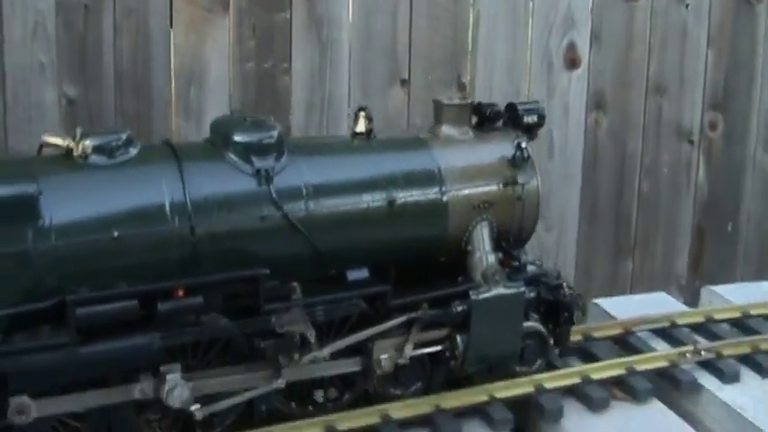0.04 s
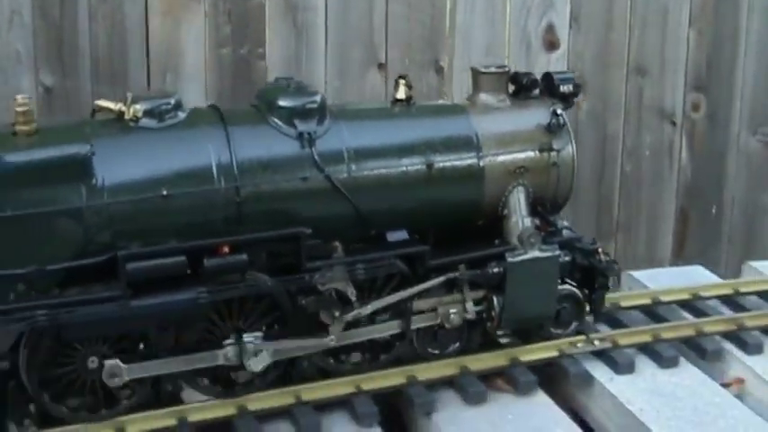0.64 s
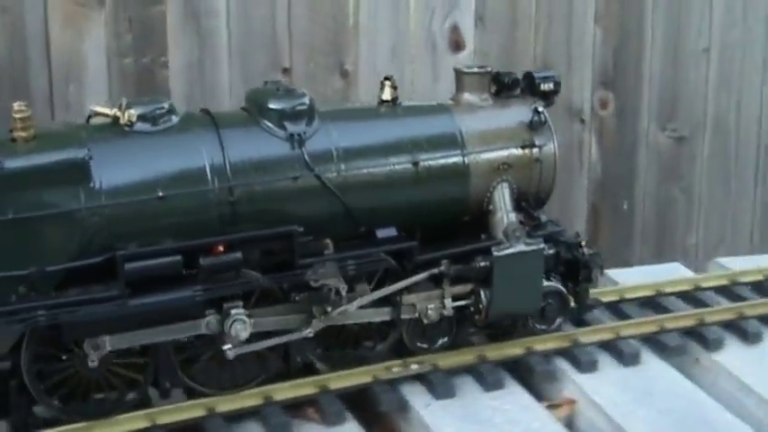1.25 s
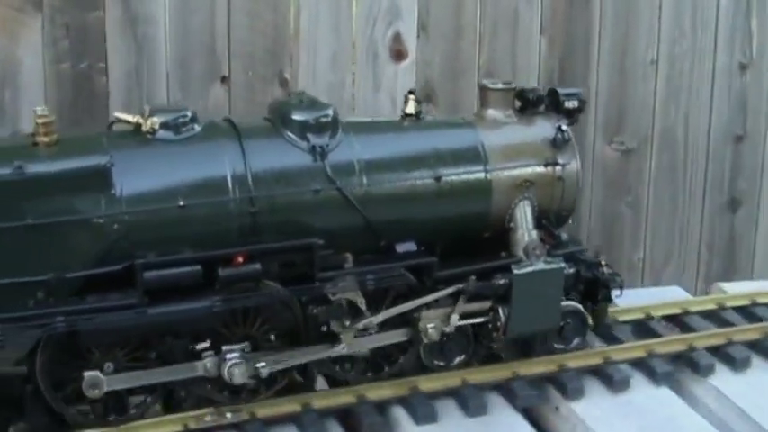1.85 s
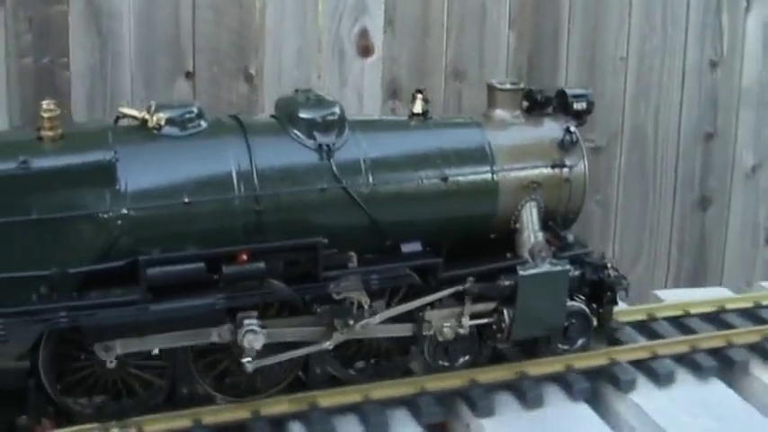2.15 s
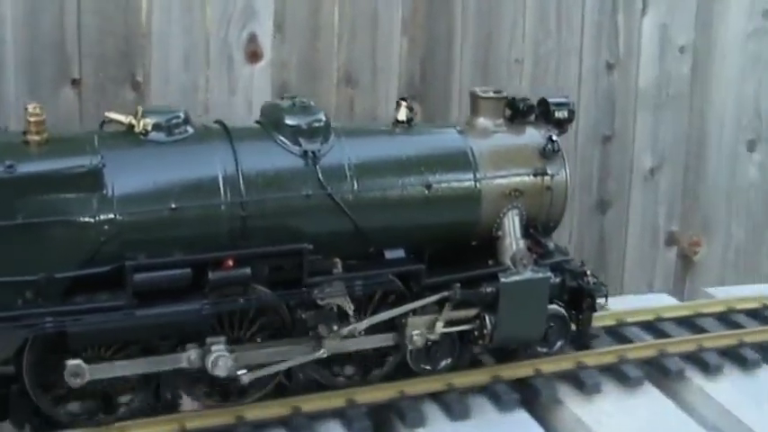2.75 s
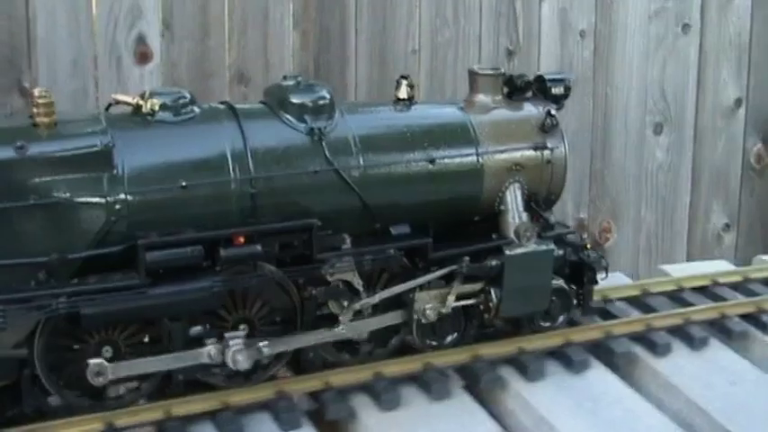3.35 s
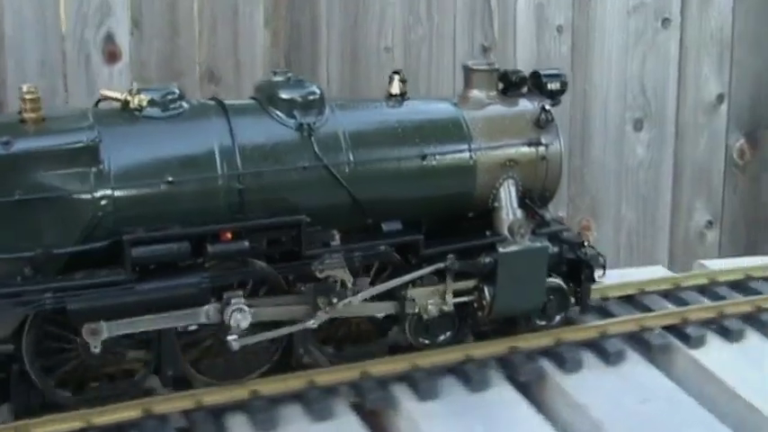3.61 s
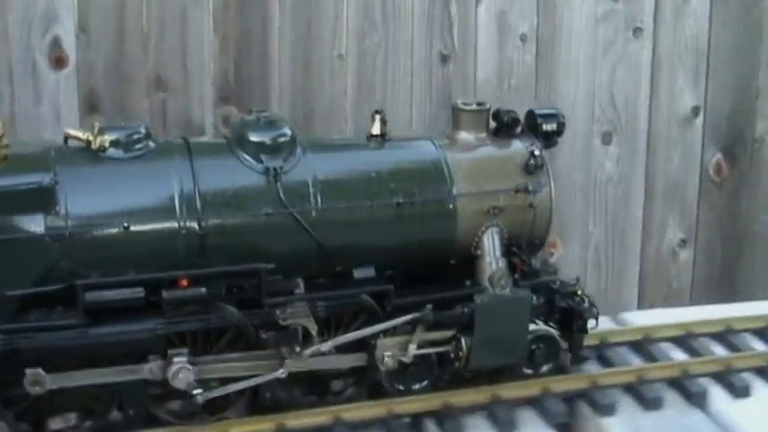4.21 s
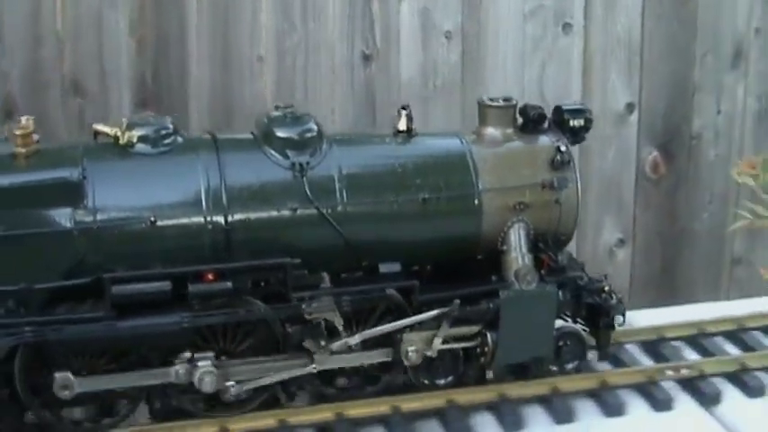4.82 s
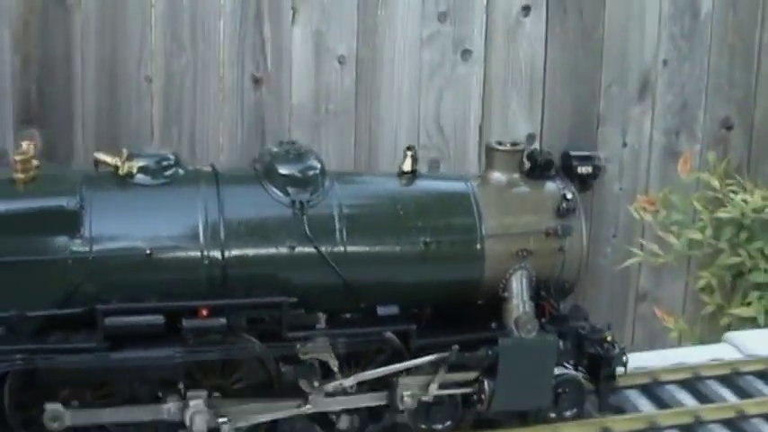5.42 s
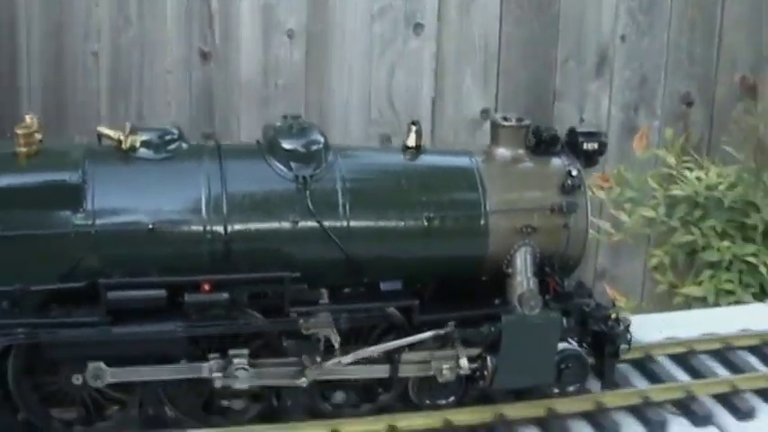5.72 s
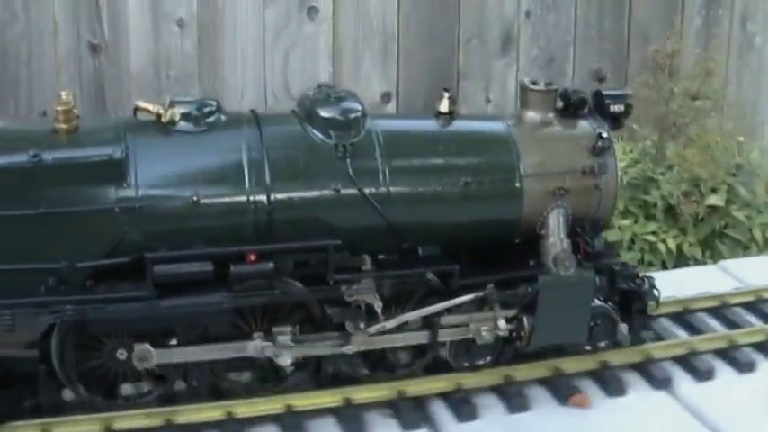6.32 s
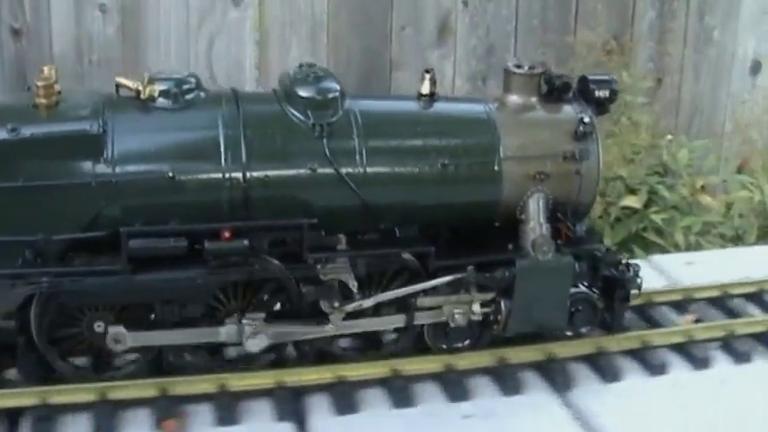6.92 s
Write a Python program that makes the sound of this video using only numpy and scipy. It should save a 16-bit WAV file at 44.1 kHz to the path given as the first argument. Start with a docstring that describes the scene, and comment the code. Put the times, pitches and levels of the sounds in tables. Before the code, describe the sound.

Hissy, hollow chuffs from a small steam engine start at about four a second and build to about seven, repeating an uneven four-beat figure. A soft bed of escaping steam fills the gaps, along with crackling spurts and scattered ticks of water on hot metal. Below, the fire pulses faintly and the wheels rumble. The microphone stays close alongside, outdoors by a wooden fence.

```python
"""A miniature live-steam locomotive chuffs along garden track, gathering speed, heard from close beside it.
Four times a wheel turn a cylinder lets go: the blast pipe hisses near 6 kHz, the smokebox barks and
the draught pulls on the fire. The valves are unevenly set, so the same limping four-beat figure returns
with every turn, its blasts shorter as the speed rises. Between beats steam trails off, a gland blows
in step with the rods and hot water spits from the stack, over a low rumble of wheels."""
import sys
import numpy as np
from scipy.fft import rfft, irfft, next_fast_len
from scipy.io import wavfile
from scipy.ndimage import uniform_filter1d, minimum_filter1d, map_coordinates

SR = 44100
rng = np.random.default_rng(int(sys.argv[2]) if len(sys.argv) > 2 else 0)


def digitize_waveform(pressure):
    """Quantize a signal to 16-bit integers and store it at the path in sys.argv[1].

    Rows of a 2-D input are taken as channels; values are limited to [-1, 1].
    """
    field = np.atleast_2d(pressure).T
    bounded = np.clip(field, -1, 1)
    quanta = np.round(bounded * 32767).astype(np.int16)
    wavfile.write(sys.argv[1], SR, quanta)


N = 311346

# The exhaust beats. Each row: start in seconds, level offset in dB, extra trailing steam in dB.
# The last beat is boosted into an abrupt click as the sound ends.
BEATS = [(0.001, 0, -3), (0.266, -0.5, -1), (0.547, -1, -2), (0.788, 1.5, 2), (0.982, 0, -3),
         (1.222, -0.1, 0), (1.484, 0.5, -7), (1.726, 0.5, -3.5), (1.969, -2, -1.5), (2.192, 0, 0),
         (2.431, 0, 3), (2.632, 0, 4.5), (2.778, 0.5, 0), (2.974, -1, 0), (3.162, 1.5, 1.5),
         (3.337, -1.5, 4), (3.477, 0.5, 2), (3.653, 0.5, 0.5), (3.847, -0.5, -5), (4.034, -1, -0.5),
         (4.212, 0, 1.5), (4.377, -1, 2), (4.554, -0.5, -0.5), (4.721, .3, -2), (4.881, 0, 1.5),
         (5.037, 0.5, 1), (5.202, 0, 1), (5.355, 0.2, 2), (5.501, -.5, 3.5), (5.642, -0.5, 2),
         (5.798, 0, -1), (5.933, 0, 0), (6.07, 1.5, -1.5), (6.208, -0.5, -1.5), (6.356, -0.5, 3),
         (6.492, -0.5, -1), (6.631, -.5, 1), (6.761, 0.5, 1), (6.909, -0.5, -11), (7.052, 6.5, 0)]
# The four beats of a wheel turn. Each row: base blast length in seconds, then base levels in dB of
# nozzle hiss, jet rush, smokebox bark and trailing steam.
TURN = [(.051, -18.5, -27.5, -24.5, -29.5), (0.04, -19.8, -28.5, -25.5, -27),
        (0.052, -19.5, -29.5, -26, -35.5), (.045, -18.5, -27.5, -25, -28)]


def exhaust(sputter_db, flutter_db, surge_db):
    """Each chuff sounds the hissing blast pipe, the broad jet above the stack and the hollow smokebox."""
    # The colours of jet and smokebox. Each row: frequency in Hz, relative level in dB.
    jet = [(300, -8.5), (900, -6.5), (1200, 0.5), (1400, -2), (1600, 3), (1900, 2.5), (2200, -2.5),
           (2480, 0.5), (2850, -2), (4500, -8), (7500, -4), (10300, -5), (12000, -16), (15000, -20.5)]
    smokebox = [(70, -37), (170, -15.5), (280, 0.5), (430, 0.5), (520, -2), (600, 0.5), (810, .5),
                (900, -10.5), (1020, -21), (2000, -60)]
    offset_db, linger_db = beats()[2:]
    hiss_db, rush_db, bark_db, base_trail_db = figure()[1:]
    trail_db = base_trail_db + linger_db
    # wet steam leaves in uneven spurts
    sputter = unit(amp(sputter_db * wobble(600) + flutter_db * wobble(130) + surge_db * wobble(45)))
    hiss = flow(hiss_db + offset_db, trail_db, opening=0.01, stretch=0.93, steepness=6.2, closing=0.11)
    rush = flow(rush_db + offset_db, trail_db - 10, opening=0.0098, stretch=1, steepness=8.6, closing=0.1)
    bark = flow(bark_db + offset_db, trail_db - 5.5,
                opening=0.01, stretch=0.98, steepness=4.7, closing=0.069)
    steam = sputter * (hiss * blast_pipe() + rush * turbulence(jet))
    body = bark * turbulence(smokebox) * unit(amp(0.71 * wobble(90)))
    return steam + body


def blast_pipe():
    """The nozzle's hiss, with some noise ringing in the pipe's two sharp resonances."""
    # The colour of the hiss. Each row: frequency in Hz, relative level in dB.
    nozzle = [(2500, -58), (3550, -30), (3880, -16.5), (4700, -10), (5050, -9.5), (5450, -0.5), (5680, -1),
              (5950, 1), (6300, -4), (6700, -7.5), (7500, -19), (9000, -40), (12000, -55)]
    # The pipe's resonances. Each row: centre in Hz, width in Hz, relative level in dB.
    resonances = [(5520, 90, -5.5), (5923, 170, 0)]

    def modes(hz):
        return sum(amp(db) * 1j * hz * width / (centre ** 2 - hz ** 2 + 1j * hz * width)
                   for centre, width, db in resonances)

    ring = unit(filtered(turbulence(nozzle), modes))
    return unit(turbulence(nozzle) + amp(-7.0) * ring)


def flow(blast_db, trail_db, opening, stretch, steepness, closing):
    """Chuff envelope: the valve opens, the cylinder blows down, the piston pushes out the rest."""
    usual_gap_s = 0.17
    overlap_s = 0.018  # one exhaust port is still open when the next one cracks
    t, power = np.arange(N) / SR, np.zeros(N)
    starts, gaps = beats()[:2]
    for start, gap, length, blast, trail in zip(starts, gaps, figure()[0], blast_db, trail_db):
        near = slice(*np.searchsorted(t, [start, start + 2 * gap]))
        age = t[near] - start
        slowness = gap / usual_gap_s  # slow beats open more softly and blow longer
        valve = np.clip(age / (opening * slowness ** 0.49), 0, 1)
        blast_s = stretch * length * slowness ** 0.7
        blowdown = amp(blast) ** 2 / (1 + (age / blast_s) ** steepness)
        stroke = amp(trail) ** 2 * np.clip((gap + overlap_s - age) / closing, 0, 1)
        power[near] += valve ** 2 * (blowdown + stroke)
    return np.sqrt(power)


def beats():
    """Start, time to the next beat, level offset and extra trailing steam of every beat."""
    starts, offset_db, linger_db = np.transpose(BEATS)
    gaps = np.diff(starts)
    return starts, np.append(gaps, gaps[-1]), offset_db, linger_db


def figure():
    """The limping four-beat figure: the columns of TURN, repeated over all beats."""
    return np.array(TURN)[np.arange(len(BEATS)) % len(TURN)].T


def gland(crackle_db, sweep_s, comb):
    """A leaky gland blows thin, crackling spurts of wet steam, their colour swept by the passing rods."""
    # Spurts after the first three beats of a turn. Each row: middle and half length as shares of
    # the beat, relative level in dB, fade in dB per second.
    strokes = [(0.81, 0.22, 0, 0), (.55, .15, 1.2, 0.42), (0.81, 0.27, 2, 2.1)]
    # The gland's swell. Each row: time in seconds, base level in dB.
    swell = [(0, -32), (.7, -32), (1.2, -35), (2.2, -41), (2.7, -36), (3.6, -32.5), (4.4, -39), (5.5, -37),
             (7.06, -41)]
    # The colour of the spurts. Each row: frequency in Hz, relative level in dB.
    sizzle = [(1500, -5.5), (3500, -8), (5500, 11), (7500, -1.5), (9500, 5.5), (10600, -9), (12000, -12),
              (15000, -22)]
    t, spurts = np.arange(N) / SR, np.zeros(N)
    beat = curve(np.column_stack([beats()[0], np.arange(len(BEATS))]))
    for quarter, (middle, half, db, fade) in enumerate(strokes):
        beats_away = (beat - quarter - middle + 2) % len(TURN) - 2
        spurts += amp(db - fade * t) / (1 + (beats_away / half) ** 4)
    jet = turbulence(sizzle)
    rod_delay = np.column_stack([t, 0.000687 + sweep_s * wobble(11)])
    crackle = unit(amp(crackle_db * wobble(500)))
    swept_jet = unit(jet + comb * echo(jet, rod_delay))
    return amp(curve(swell)) * spurts * crackle * swept_jet


def spits(knock_db, decay_s, faint_db, count):
    """Drops burst on hot metal in tiny cracks with a midrange knock, a few loud and many faint."""
    # The loud drops. Each row: start in seconds, crack level in dB, knock in dB above the crack
    # before knock_db is added.
    loud = [(1.3319, -20, -1), (2.1056, -22.5, 4.5), (2.281, -12, -3), (3.6174, -20, -13), (4.326, -19, -9),
            (4.345, -17, -5), (5.0205, -19, -6), (5.092, -13, -11), (5.468, -22, -10), (5.6092, -23, -7),
            (6.1604, -23, 5), (6.7451, -19, -5)]
    # The colours of crack and knock. Each row: frequency in Hz, relative level in dB.
    crack_colour = [(2000, -12), (5000, 0), (7000, -1), (10500, -5), (12000, -17), (15000, -22)]
    knock_colour = [(200, -22), (700, 13), (2000, 1), (4500, -9), (8000, -18)]
    when, softness, dryness = rng.random((count, 3)).T
    faint = np.column_stack([when * N / SR, faint_db - 10 * softness, -10 * dryness])
    t = np.arange(SR // 100) / SR
    cracks, knocks = np.zeros((2, N + SR))
    for start, db, mid_db in np.vstack([loud, faint]):
        burst = amp(db - 60 * t / decay_s)
        cracks[round(start * SR):][:len(t)] += burst
        knocks[round(start * SR):][:len(t)] += burst * amp(mid_db + knock_db)
    return cracks[:N] * turbulence(crack_colour) + knocks[:N] * turbulence(knock_colour)


def fire(gain_db, draught_db, flicker_db):
    """The fire roars low in the boiler, harder while a beat draws air through it."""
    # The fire's swell. Each row: time in seconds, base level in dB.
    swell = [(0, -35.5), (1.1, -31.5), (2.8, -31.5), (3.5, -34.5), (4.3, -34), (5.3, -30), (6.2, -29),
             (7.06, -32.5)]
    # The colour of the roar. Each row: frequency in Hz, relative level in dB.
    firebox = [(60, -25.5), (150, -18.5), (210, -12), (270, -1.5), (325, 2), (375, -1.5), (430, -5),
               (520, -14), (760, -12.5), (950, -20.5), (1800, -27), (4000, -46)]
    even_db = np.zeros(len(BEATS))
    draught = flow(even_db, even_db - 6, opening=0.013, stretch=1.45, steepness=10.0, closing=0.099)
    breathing = unit(amp(draught_db * draught + flicker_db * wobble(40)))
    return amp(curve(swell) + gain_db) * breathing * turbulence(firebox)


def leak(level_db, flutter_db):
    """Steam escapes all the time from glands and stack, a soft bed of hiss."""
    # The colour of the leak. Each row: frequency in Hz, relative level in dB.
    steam = [(500, -5.5), (1200, -5), (1700, 3.5), (2200, -1.5), (2500, 2), (3450, 0.5), (3900, 4.5),
             (4800, 6), (5700, 9.5), (7200, -1.5), (8500, -1), (9900, -1), (11200, -7), (12600, -12.5),
             (15000, -17)]
    return amp(level_db + flutter_db * wobble(45)) * turbulence(steam)


def wheels(uneven_db):
    """The wheels rumble on the plank track bed."""
    # The rumble's swell. Each row: time in seconds, level in dB.
    swell = [(0, -48), (1.7, -49.5), (2.7, -46), (4.3, -48.5), (5.3, -45.5), (7.06, -45.5)]
    # The colour of the rumble. Each row: frequency in Hz, relative level in dB.
    rumble = [(15, -17), (35, -21), (60, -5), (90, 1), (118, -10.5), (200, -4.5), (500, -27), (1500, -60)]
    return amp(curve(swell) + uneven_db * wobble(9)) * turbulence(rumble)


def garden(x, boiler_db, bed_db, fence_db):
    """Echoes off near surfaces comb the steam's sound; they scatter the highest treble away."""
    # Echoes off boiler, track bed and board fence, drifting as the listener moves.
    # Each row: time in seconds, delay in seconds.
    boiler = [(0, .00128), (3.3, .00125), (7.06, .00132)]
    bed = [(0, .00173), (4, .00164), (7.06, .00153)]
    fence = [(0, .01), (2, .00922), (4, .00862), (7.06, .00836)]
    # The colour of the echoes. Each row: frequency in Hz, gain in dB.
    colour = [(500, -6.5), (1500, -11.0), (6000, 0.5), (12000, -18)]
    reflected = filtered(x, lambda hz: amp(along(colour, hz)))
    paths = [(boiler, boiler_db), (bed, bed_db), (fence, fence_db)]
    return x + sum(amp(db) * echo(reflected, delays) for delays, db in paths)


def echo(x, delays):
    """x arriving over a longer path whose length drifts."""
    late = np.arange(N) - curve(delays) * SR
    return np.array([map_coordinates(channel, [late]) for channel in x])


def turbulence(spectrum):
    """Coloured stereo noise of rms 1, with a narrow image."""
    # How alike left and right are. Each row: frequency in Hz, correlation.
    likeness = [(100, .96), (600, .98), (1300, .88), (3000, .94), (6000, .985), (9000, .94), (10800, .78),
                (14500, .88)]

    def colour(hz):
        spread = np.arccos(np.clip(along(likeness, hz), -1, 1)) / 2
        return amp(along(spectrum, hz)) * [np.cos(spread), np.sin(spread)]

    mid, side = filtered(rng.standard_normal((2, N)), colour)
    return unit(np.array([mid + side, mid - side]))


def amp(db):
    """Decibels to gain."""
    return 10 ** (np.asarray(db) / 20)


def unit(x):
    """x scaled to rms 1."""
    return x / np.sqrt(np.mean(x ** 2) + 1e-20)


def along(points, hz):
    """(Hz, value) points joined on a log frequency axis."""
    knots_hz, values = np.transpose(points)
    return np.interp(np.log(hz + 1), np.log(knots_hz + 1), values)


def curve(rows):
    """(seconds, value) rows to one value per sample."""
    return np.interp(np.arange(N) / SR, *np.transpose(rows))


def wobble(rate):
    """A smooth random curve, rate knots a second."""
    return map_coordinates(rng.standard_normal(int(N * rate / SR) + 4), [np.arange(N) * rate / SR])


def filtered(x, response):
    """x shaped by a complex frequency response."""
    size = next_fast_len(N + SR // 2)
    return irfft(rfft(x, size) * response(np.fft.rfftfreq(size, 1 / SR)), size)[..., :N]


def limiter(x, ceiling_db, hold_s):
    """The gain ducks just before a peak and recovers just after it."""
    needed = np.minimum(1, amp(ceiling_db) / (np.abs(x).max(axis=0) + 1e-9))
    span = max(2, int(hold_s * SR))
    return x * uniform_filter1d(minimum_filter1d(needed, span), span)


def scene():
    """Engine and track, heard from beside the boiler."""
    stack = exhaust(sputter_db=0.84, flutter_db=0.28, surge_db=0.58)
    stack += leak(level_db=-36.0, flutter_db=2.5)
    steam = garden(stack, boiler_db=-18.5, bed_db=-20.5, fence_db=-13.5)
    steam += gland(crackle_db=6.0, sweep_s=0.00003, comb=0.49)
    water = spits(knock_db=-1.5, decay_s=0.0082, faint_db=-27, count=40)
    rumble = wheels(uneven_db=2.5)
    roar = fire(gain_db=0.5, draught_db=5, flicker_db=1.0)
    return steam + water + roar + rumble


def record(dry):
    """Two microphone ports differ in phase and level; peaks are limited and the top treble is cut."""
    # Phase between the ports. Each row: frequency in Hz, lead of the left in radians.
    phase = [(30, .4), (90, .65), (200, 1.05), (700, 1.03), (1200, .47), (2000, .15), (6000, .1),
             (10200, 0), (11200, -1), (12000, -2.4), (12800, -2.7), (13400, -1.4), (14200, -.2)]
    # Stereo balance. Each row: frequency in Hz, left over right in dB.
    balance = [(90, -.5), (330, 0.1), (500, -1.5), (770, 2.5), (1700, -0.5), (4200, -3), (6400, -2.5),
               (9800, -0.3)]
    top_hz = 15050

    def ports(hz):
        left = amp(along(balance, hz) / 2) * np.exp(0.5j * along(phase, hz))
        return np.array([left, 1 / left])

    limited = limiter(filtered(dry, ports), ceiling_db=-5.5, hold_s=0.0035)
    return filtered(limited, lambda hz: hz < top_hz)


dry = scene()
out = record(dry)
digitize_waveform(out)
```